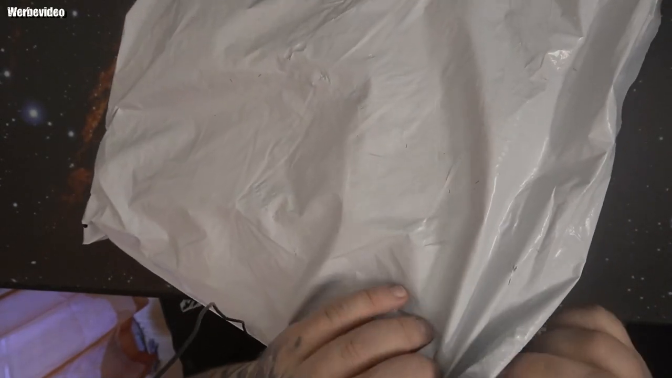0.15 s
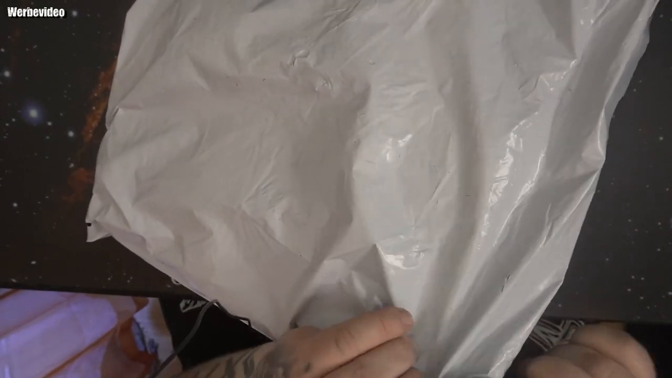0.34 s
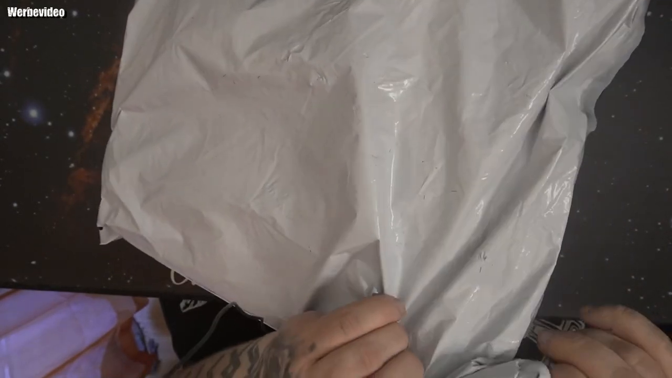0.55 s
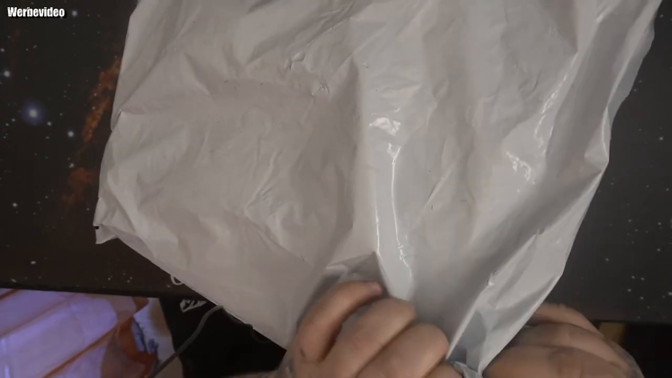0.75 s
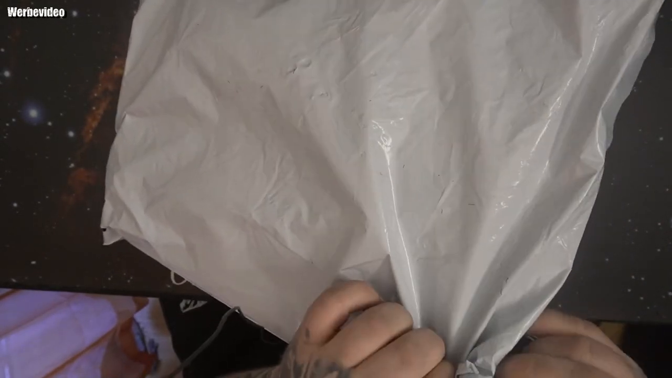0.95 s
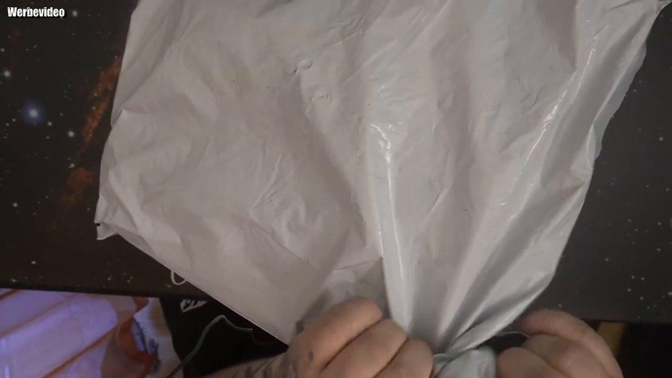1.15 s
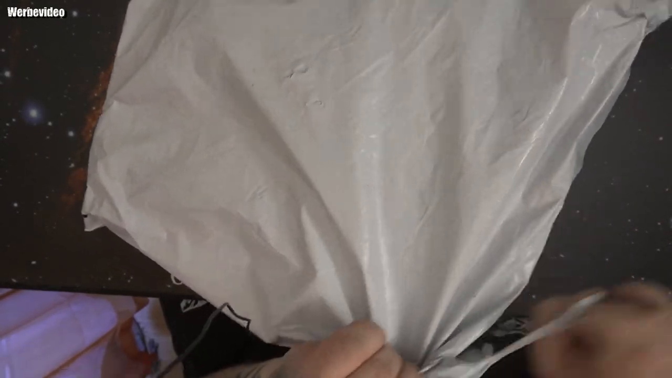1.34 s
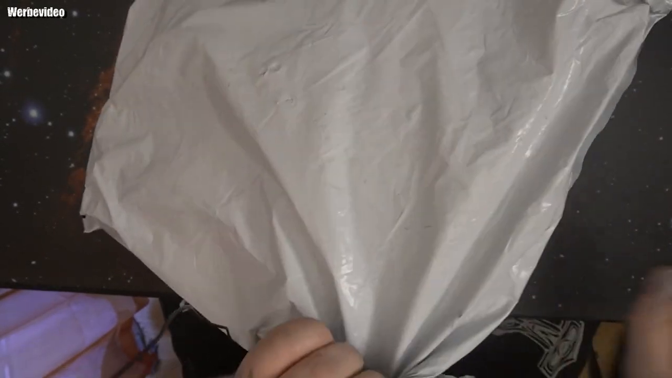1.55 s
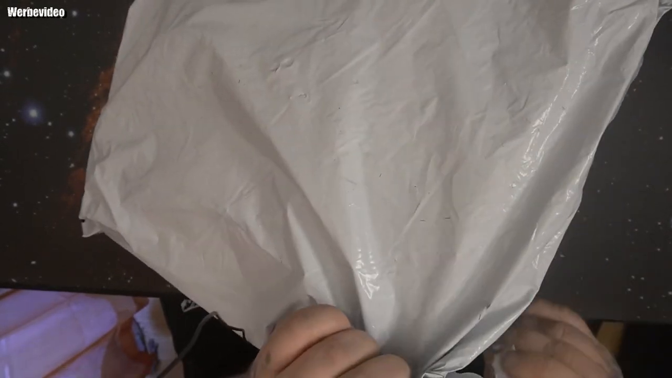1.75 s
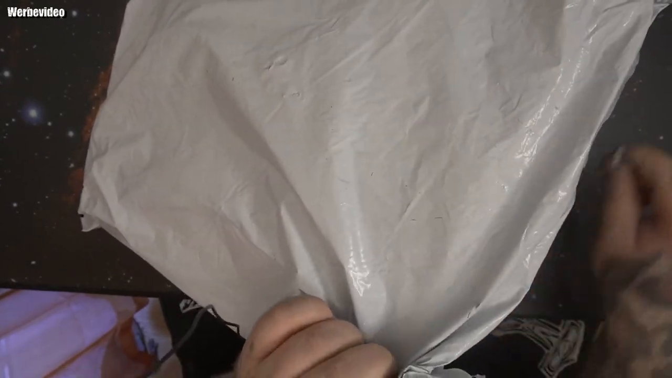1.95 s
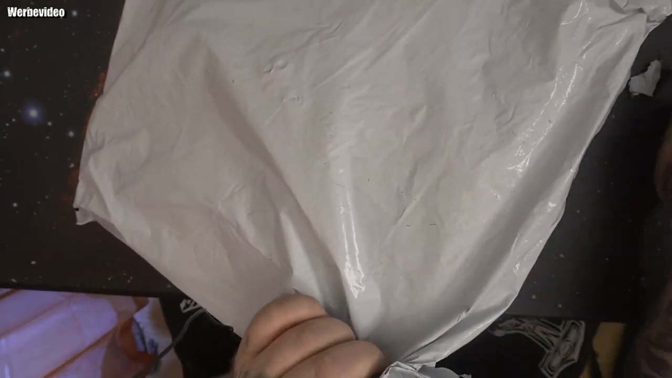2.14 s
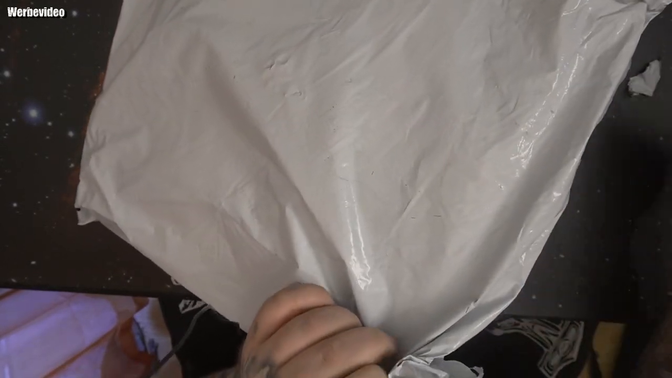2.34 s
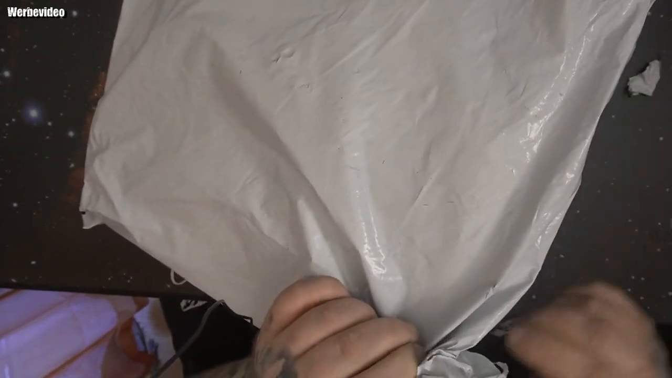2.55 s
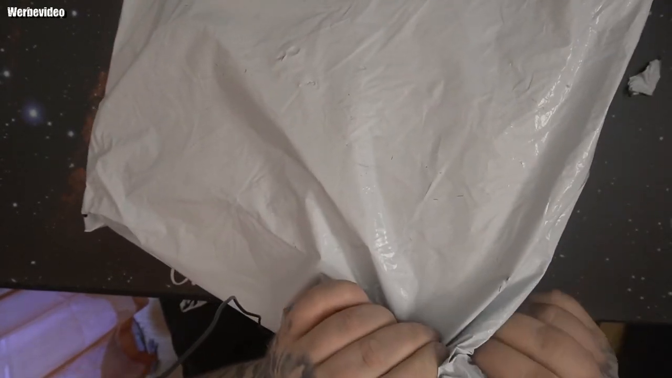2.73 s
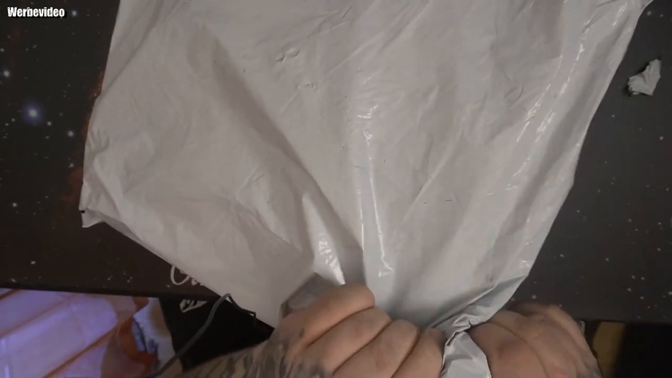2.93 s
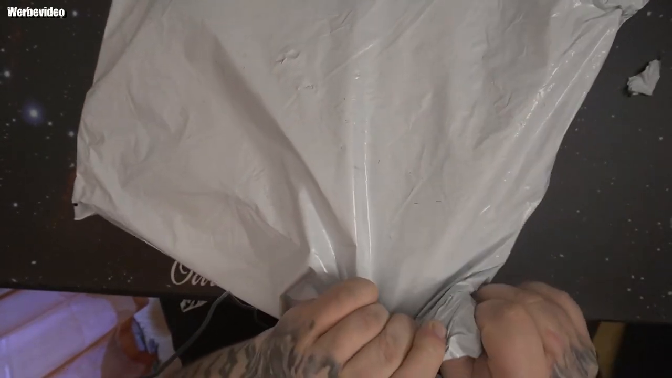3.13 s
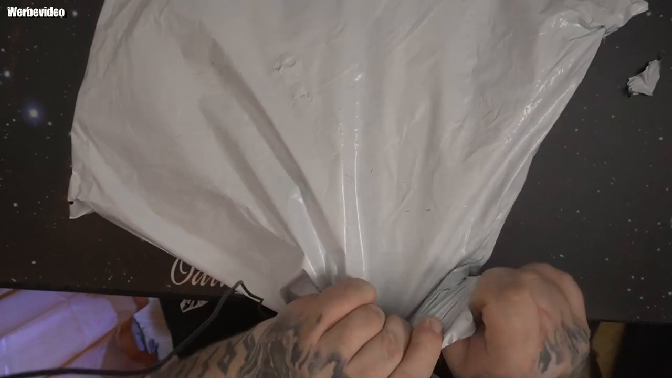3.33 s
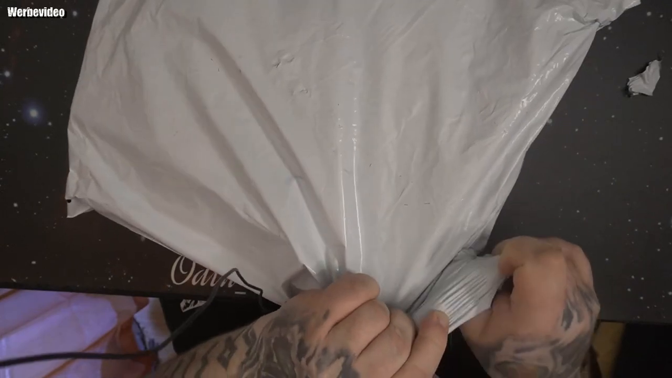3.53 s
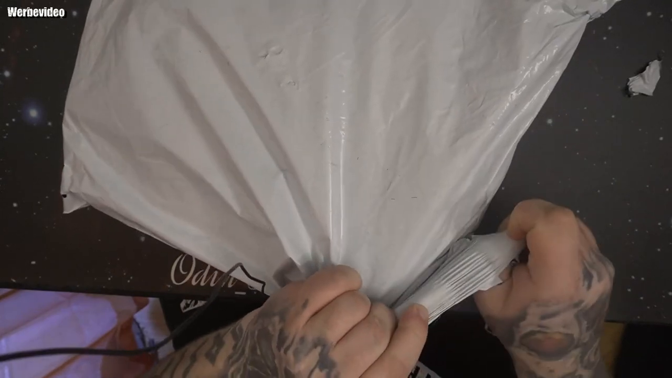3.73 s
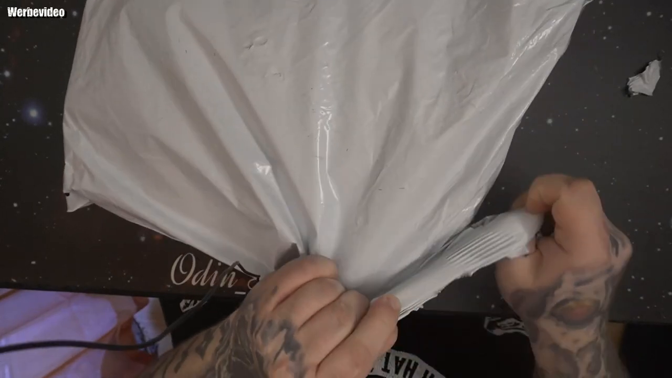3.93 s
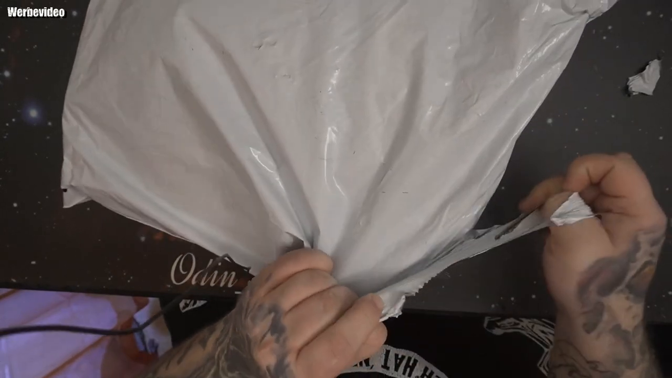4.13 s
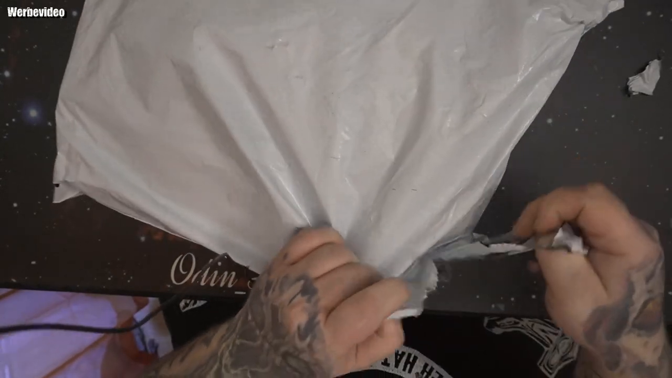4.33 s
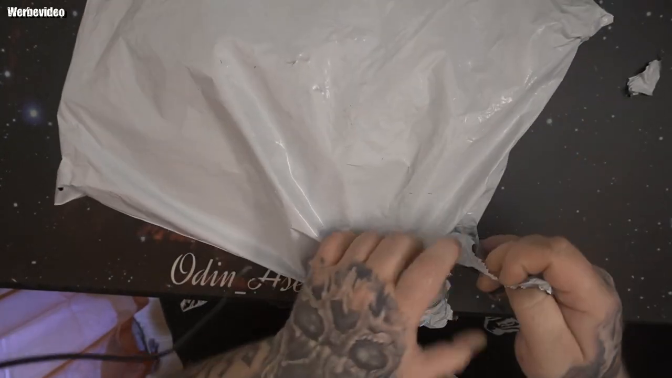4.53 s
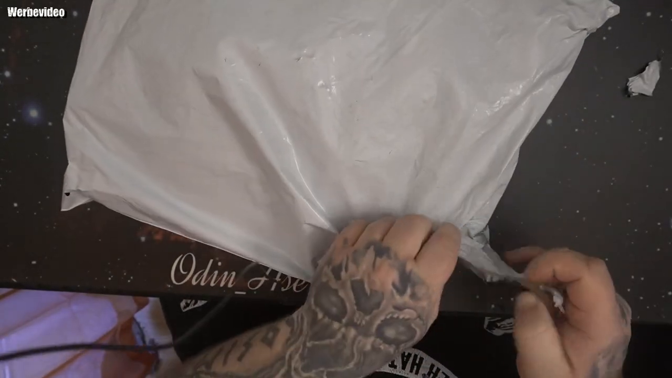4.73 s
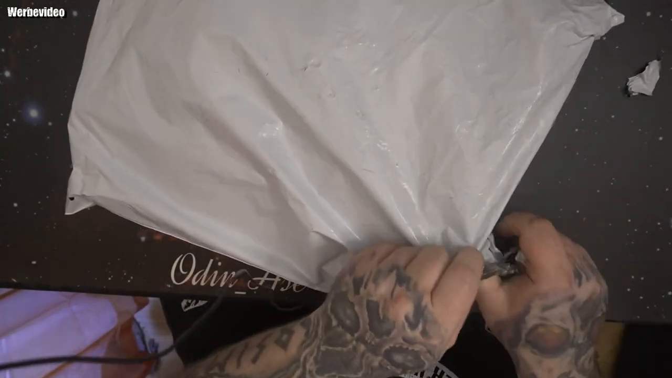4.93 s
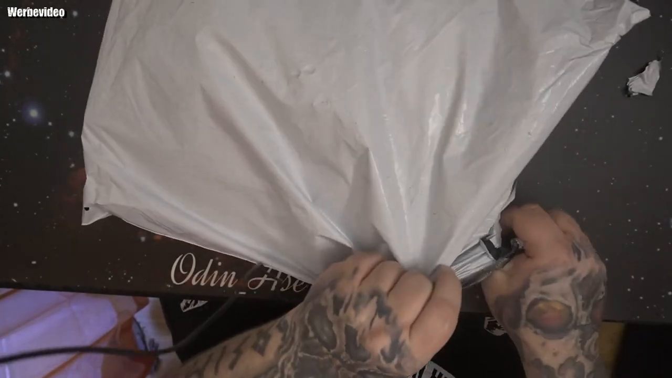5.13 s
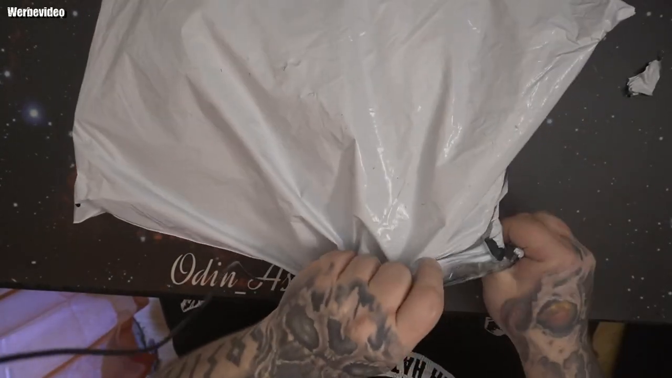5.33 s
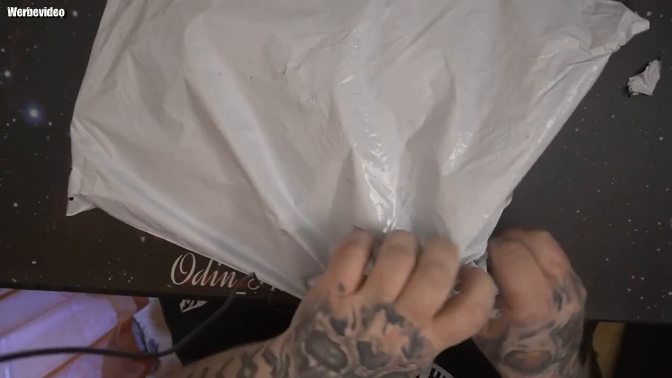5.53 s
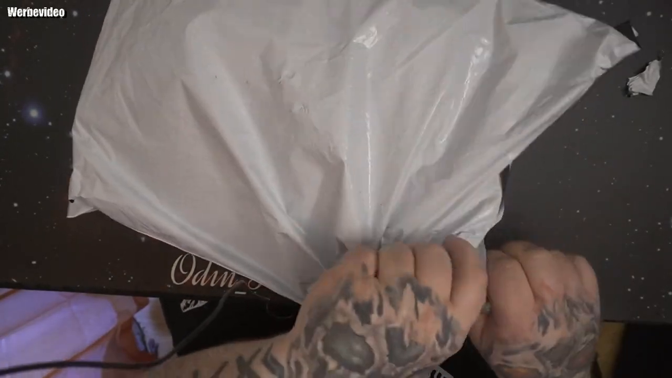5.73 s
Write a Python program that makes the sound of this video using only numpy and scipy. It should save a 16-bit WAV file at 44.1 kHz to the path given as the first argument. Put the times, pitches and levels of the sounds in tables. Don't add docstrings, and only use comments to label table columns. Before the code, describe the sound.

Hands crumple and twist a thin plastic mailer bag close to the microphone, pause almost silently, then stretch and tear it with sharp crackling snaps.

```python
import sys
import numpy as np
from scipy import signal
from scipy.fft import rfft, irfft
from scipy.io import wavfile

SR = 44100
rng = np.random.default_rng(int(sys.argv[2]) if len(sys.argv) > 2 else 0)


def generate_wav(signal):
    frames = np.transpose(np.atleast_2d(signal))
    scaled = np.clip(frames, -1, 1) * 32767
    pcm = np.round(scaled).astype(np.int16)
    wavfile.write(sys.argv[1], SR, pcm)


def volts_from_decibels(level):
    exponent = np.asarray(level, float) / 20
    return 10 ** exponent


N = 258867

# crest_s, crackle_db, build_s per 10 dB, release_s per 10 dB
SQUEEZES = [(0.15, -43, 0.023, 0.37), (0.2, -40, 0.035, 0.062), (0.255, -44, 0.018, .02),
            (0.33, -32.5, 0.066, 0.054), (0.438, -24, 0.042, 0.035), (0.619, -31.5, 0.019, 0.053),
            (0.7, -31.5, 0.037, 0.056), (0.786, -32, 0.14, 0.03), (0.929, -32.5, 0.12, 0.28),
            (1.196, -27, 0.043, 0.1), (1.365, -24.5, 0.0074, 0.024), (1.408, -31.5, 0.018, 0.13),
            (1.61, -56, .02, 0.055), (1.8, -49, 0.045, 0.017), (1.864, -50, .01, 0.099),
            (2.02, -58, 0.032, 0.038), (2.22, -51, 0.21, 0.067), (2.622, -49.5, 0.0088, 0.11),
            (2.665, -42, 0.02, .05), (2.71, -38.5, 0.038, 0.14), (2.837, -32, 0.027, 0.053),
            (2.94, -33.5, 0.11, 0.12), (3.056, -31, 0.13, 0.071), (3.334, -31.5, 0.21, 0.095),
            (3.428, -28, 0.02, 0.04), (3.512, -28.5, 0.043, 0.04), (3.668, -26.5, 0.062, 0.032),
            (3.874, -30.5, 0.07, 0.053), (4.032, -29, 0.015, 0.1), (4.453, -32.5, 0.17, 0.11),
            (4.61, -35, 0.012, 0.026), (4.775, -30, 0.023, 0.017), (4.683, -31, 0.027, 0.086),
            (4.889, -30, 0.1, 0.24), (5.075, -28, 0.018, 0.17), (5.368, -34.5, 0.051, 0.043),
            (5.505, -32.5, 0.078, 0.13), (5.869, -24.5, 0.25, 0.12)]
# time_s, resting_crackle_db, bag_slack_db, film_turned_to_microphone_db
HOLD = [(0, -45.5, 3.5, 5), (0.12, -54, 1, -2), (0.75, -46, -1, 8), (1.1, -45.5, -1.5, 5),
        (1.4, -53, 0, 7.5), (1.7, -63, 2.5, 0), (2.0, -59.5, 4, 9), (2.15, -67, -1.5, 3),
        (2.3, -57.5, 3, 12), (2.6, -63.5, -1, -7), (2.67, -56, -5, 4.5), (3.15, -50, 2, 1),
        (3.5, -48, -4.5, -5.5), (3.9, -40, 2.5, 5), (4.6, -48.5, -1.5, 1.5), (5.07, -37, 2.5, 2.5),
        (5.4, -52.5, 0.5, 2), (5.87, -31.5, 1, 1.5)]
# time_s, typical_crease_pitch_hz
CREASE_FINENESS = [
    (0, 4750),
    (1.4, 4700),
    (2.0, 7840),
    (2.8, 4280),
    (3.4, 7820),
    (4.1, 5450),
    (4.9, 7440),
    (5.87, 7280),
]
# frequency_hz, density_db per Hz
FILM = [(1180, -17), (2000, -18), (2540, -4.5), (2870, -1), (3280, -6), (3880, -3.5), (7860, 1),
        (11100, -6), (15800, -23.5), (16150, -70), (16500, -100)]
# frequency_hz, density_db per Hz
BODY = [(120, -41.5), (200, 0), (400, 2), (900, 0), (1050, -3.5), (1550, 1), (2300, -4.5), (3000, -4),
        (4200, -19.5), (7000, -59.5)]
# start_s, peak_db, crease_pitch_hz, body_share_db, length_ms
SNAPS = [(0.1484, -21, 3760, 3.5, 1.86), (0.2869, -25, 2720, 0, 0.59), (0.3082, -10, 6060, -15, 1.66),
         (0.706, -13, 4940, -7, 1.5), (0.8511, -14, 4560, -12, 0.97), (1.1775, -14, 5060, -30, 0.97),
         (1.33, -1.5, 3900, -13.5, 0.46), (1.351, -0.5, 4830, -36, 2.7), (1.3762, -7, 4340, -23, 1.8),
         (1.4012, -13.5, 9300, -0.5, 1.45), (2.4962, -38, 2420, 4.5, 3.4), (2.8464, -10, 4330, -37, 1.35),
         (3.1935, -8.5, 5150, -38, 1.6), (3.2032, -8, 8300, -33, 1.2), (3.589, -8.5, 7300, -24, 2.64),
         (3.5987, -2.5, 5630, -49, 1.32), (3.6702, -13.5, 2070, -6, 0.84), (3.6761, -3.5, 6550, -35, 2.97),
         (3.8161, -10.5, 6250, -26, 1.34), (4.018, -3.5, 5800, -9, 3.1), (4.4581, -13.5, 7550, -1.5, 0.24),
         (4.8325, -11.5, 7800, -9, 1.6), (5.7684, -18, 1610, -23, 4.4), (5.8349, 1, 6700, -25, 0.32)]
# start_s,
# peak_db, crease_pitch_hz
TICKS = [(0.0156, -33, 3950), (0.0716, -31, 1400), (0.1111, -21, 7200), (0.1142, -21, 4400),
         (0.1356, -11, 4930), (0.1935, -20, 5100), (0.2537, -23, 1380), (0.2598, -22, 1280),
         (0.34, -13, 3800), (0.351, -16, 6900), (0.3703, -20.5, 3920), (0.3788, -30, 1500),
         (0.387, -28, 1600), (0.417, -12.5, 5230), (0.4355, -17.5, 3700), (0.4546, -18, 5100),
         (0.4622, -15.5, 3650), (0.5493, -21, 3670), (0.5828, -22, 6940), (0.5947, -23, 5000),
         (0.6138, -21, 3500), (0.6256, -16, 3700), (0.629, -15, 5430), (0.6693, -14, 4200),
         (0.6783, -20.5, 1700), (0.684, -24, 1400), (0.702, -20, 1310), (0.7255, -17, 3720),
         (0.7392, -17, 5900),
         (0.775, -18.5, 6200), (0.777, -24, 9700), (0.793, -17, 4100), (0.8644, -24, 1680),
            (0.874, -23, 3900), (0.8873, -20, 6400), (0.9161, -20.5, 1610), (0.966, -27, 6600),
            (0.9967, -24.5, 8800), (1.0221, -20, 4670), (1.0368, -15.5, 6430), (1.0638, -35, 6800),
            (1.0793, -21.5, 3930), (1.0994, -17, 9100), (1.1029, -28, 3800), (1.1517, -27, 5200),
            (1.1666, -23, 4500), (1.1725, -14.5, 5170), (1.191, -16, 1600), (1.1982, -14.5, 4220),
            (1.2136, -13, 5200), (1.339, -22, 5600), (1.355, -11, 6200), (1.3677, -21, 3930),
            (1.424, -18, 8600),
         (1.529, -31, 1705), (1.5327, -28, 4500), (1.5537, -31, 5900), (1.5997, -36, 1460),
            (1.6081, -26, 4800), (1.639, -33, 4500), (1.6683, -35, 8400), (1.6818, -35, 7100),
            (1.685, -37, 5600), (1.7182, -29, 4800), (1.7356, -30, 1170), (1.793, -31, 1740),
            (1.8025, -22.5, 6400), (1.8161, -42, 1700), (1.862, -28, 1720), (1.9296, -24, 6900),
            (2.062, -40, 4020), (2.116, -39, 4100), (2.1388, -40, 4600), (2.1504, -35, 7500),
            (2.1583, -28, 5450), (2.1678, -35.5, 1720), (2.1928, -45, 1300), (2.208, -22, 7050),
            (2.2568, -34, 1390), (2.2603, -34, 6300), (2.269, -35, 5900), (2.2872, -38, 7800),
            (2.2926, -25, 5800), (2.3406, -34, 5500), (2.4078, -36, 4750), (2.472, -38, 1500),
            (2.5196, -36, 1400), (2.5785, -45, 1600), (2.589, -34, 3700), (2.593, -36.5, 1880),
         (2.666, -32, 7200), (2.6894, -25, 3960), (2.7045, -20, 4200), (2.7387, -46, 3700),
           (2.747, -17, 5300), (2.7588, -29, 3500), (2.797, -29, 5700), (2.82, -18.5, 4200),
           (2.8277, -24, 4600), (2.8326, -28, 1720), (2.8434, -23, 4100), (2.858, -23, 4700),
           (2.87, -25, 4330), (2.8993, -18.5, 5300), (2.903, -17, 5170), (2.9348, -20.5, 2580),
           (2.9453, -24, 7600), (2.9783, -25, 1400), (3.024, -19, 5000), (3.0474, -20, 4000),
           (3.0513, -13.5, 6400), (3.1004, -22, 5400), (3.1239, -22, 6100), (3.1553, -26, 1860),
           (3.1615, -26, 1300), (3.208, -18, 6860), (3.235, -16, 7100), (3.2574, -10.5, 6600),
           (3.2668, -8, 7040), (3.2773, -18, 7300), (3.2819, -19, 1570), (3.298, -21, 1600),
           (3.304, -19, 1660), (3.3417, -14.5, 4220), (3.3443, -9, 7950),
         (3.3518, -20, 1570), (3.4096, -8, 9200), (3.4331, -11, 7700), (3.4393, -20, 4660),
           (3.455, -13.5, 1530), (3.4793, -18, 6000), (3.4884, -16, 5540), (3.4961, -23, 1620),
           (3.5105, -16, 4250), (3.5245, -7.5, 7050), (3.527, -18, 6660), (3.5594, -24, 6400),
           (3.5627, -13, 7550), (3.5835, -20, 6700), (3.6055, -17, 4800), (3.6128, -10, 7500),
           (3.6448, -10, 7800), (3.652, -19, 9000), (3.6634, -23, 1500), (3.6788, -13.5, 1670),
           (3.6854, -10.5, 6300), (3.738, -19, 5560), (3.7512, -16.5, 2040), (3.7658, -19, 7700),
           (3.8365, -12.5, 5000), (3.8576, -18, 7750), (3.8763, -18, 5000), (3.8845, -17, 7300),
           (3.9225, -16.5, 4500), (3.932, -35, 1610), (3.9372, -13.5, 6940), (3.9623, -20.5, 5600),
           (4.0011, -18, 4020),
         (4.0391, -31, 5630), (4.065, -20, 6200), (4.0786, -17, 5300), (4.089, -19, 7400),
          (4.101, -21.5, 3170), (4.1588, -26, 2800), (4.1695, -24, 1200), (4.1846, -22, 7400),
          (4.191, -25.5, 1500), (4.231, -16, 5800), (4.291, -30, 8000), (4.3038, -15.5, 6270),
          (4.3726, -19.5, 8500), (4.386, -25, 3660), (4.4074, -10, 4760), (4.4532, -10.5, 7860),
          (4.509, -14.5, 7300), (4.528, -21, 5800), (4.5438, -24, 9000), (4.5747, -15, 6100),
          (4.6253, -29, 7900), (4.6798, -26, 7600), (4.687, -20, 7500), (4.6895, -19, 8000),
          (4.7123, -15, 6450), (4.7701, -23, 6700), (4.777, -21, 5730), (4.817, -17.5, 6000),
          (4.8452, -13, 5600),
         (4.855, -15, 7700), (4.8847, -17, 3900), (4.9015, -13, 7700), (4.9477, -16, 6300),
            (4.968, -23, 7900), (4.9877, -24, 5000), (5.0145, -8, 7360), (5.0417, -15, 5100),
            (5.057, -16, 7600), (5.063, -4, 7900), (5.0691, -17, 6600), (5.085, -14, 7300),
            (5.114, -10, 7500), (5.1276, -12, 7500), (5.1338, -12, 8100), (5.1446, -9.5, 7400),
            (5.193, -23, 1900), (5.1949, -19.5, 1580), (5.2414, -15.5, 6540), (5.2604, -25, 6860),
            (5.2663, -20, 6960), (5.2738, -17, 5400), (5.3216, -28, 7690), (5.3543, -16.5, 6900),
            (5.3612, -21, 6400), (5.3722, -19, 7100), (5.3781, -11.5, 7100), (5.4022, -36, 8700),
            (5.4181, -35, 1500), (5.4329, -31, 8100), (5.449, -25, 5400), (5.4698, -15, 7100),
            (5.493, -16, 7650), (5.4966, -22, 6500), (5.502, -19, 6540), (5.5105, -20.5, 1800),
            (5.561, -8.5, 7200), (5.5704, -21, 6230), (5.5768, -19, 6500), (5.5847, -14, 7100),
            (5.6538, -9.5, 7900), (5.6653, -7.5, 7600), (5.6674, -12.5, 6200), (5.6998, -12.5, 6300),
            (5.7324, -13, 8200), (5.7436, -9, 6100), (5.7958, -7, 6370), (5.809, -14.5, 8400),
            (5.8135, -8, 7600), (5.8382, -10.5, 8500), (5.8432, -19, 7200),
         (0.479, -23, 5300),
    (1.3614, -16, 10000),
    (1.371, -19, 1200),
    (1.3813, -11, 5200),
    (1.41, -14, 4100),
    (1.9, -38, 5500),
    (2.6327, -33.5, 4330),
    (5.0105, -31, 12500),
    (5.1805, -29, 12000),
]
# start_s, peak_db, pitch_hz, t60_s
POPS = [(0.14, -25.5, 398, 0.049), (0.734, -20, 270, 0.013), (0.842, -22, 440, 0.0092),
        (1.186, -12, 610, 0.0058), (1.3256, -7, 2200, 0.0035), (1.344, -18, 187, 0.02),
        (1.367, -19, 1110, 0.0044), (1.396, -19.5, 820, 0.014), (2.49, -35, 1890, 0.0043),
        (2.66, -35, 298, 0.024), (2.699, -34, 406, 0.026), (2.829, -44, 716, 0.034),
        (3.4503, -19.5, 950, 0.0071), (3.594, -31, 920, 0.045), (3.656, -18.5, 697, 0.052),
        (3.676, -12.5, 835, 0.0077), (4.0128, -5.5, 420, 0.013), (4.0141, -12, 910, 0.012),
        (4.0132, -11, 2850, 0.0076), (4.047, -30, 322, .03), (4.1022, -21, 302, 0.028),
        (4.285, -28, 580, 0.011), (4.452, -28, 367, 0.025), (4.761, -30, 810, 0.046),
        (4.991, -24, 960, 0.018), (5.081, -27, 457, 0.049), (5.419, -36, 390, 0.033),
        (5.745, -35, 540, 0.022)]
# crest_s, level_db, centre_hz, length_s
BRUSHES = [(0.059, -49.5, 10200, 0.037), (0.198, -43, 8100, 0.053), (1.498, -39.5, 8600, 0.028),
           (1.607, -46, 8050, 0.029), (1.736, -55.5, 8100, 0.046), (1.903, -57, 9000, 0.025),
           (2.015, -51.5, 9400, 0.039), (2.213, -41, 9100, 0.017), (2.28, -59, 8540, 0.04),
           (2.64, -55, 11000, 0.028), (1.372, -28, 4960, 0.01), (1.375, -31, 11200, 0.025),
           (4.913, -36.5, 7700, 0.05), (5.1, -34, 7540, 0.17)]
# time_s, sway_db, rubbing_db
SWAY = [(0.0, -43, -48), (0.34, -33, -47), (0.45, -47.5, -53.5), (0.67, -28, -47), (0.9, -48.5, -52.5),
        (1.15, -32, -55), (1.91, -30.5, -50), (2.25, -37, -47.5), (2.75, -39.5, -56.5),
        (3.12, -38.5, -44.5), (3.35, -35.5, -68), (3.9, -29, -56), (4.15, -32, -45.5), (4.72, -43.5, -56),
        (5.0, -43, -46.5), (5.36, -31.5, -53), (5.7, -44.5, -51), (5.87, -35, -50)]
# start_s, peak_db, sway_pitch_hz
BUMPS = [
    (1.601, -17, 3.5),
    (1.717, -15, 11),
    (1.996, -28, 49),
    (2.489, -15, 6.7),
    (3.678, -5, 4.5),
    (3.816, -6.5, 14),
    (4.38, -25, 17),
]
# frequency_hz, density_db per Hz
ROOM = [(180, -34), (300, 8), (781, 7.5), (1420, -9.5), (2690, -18), (4280, -6.5), (10500, -13),
        (14000, -21)]


def rms_one(x):
    return x / np.sqrt(np.mean(x ** 2) + 1e-20)


def in_time(rows):
    s, *columns = np.transpose(rows)
    return [np.interp(np.arange(N) / SR, s, c) for c in columns]


def coloured(x, spectrum, size=4096):
    hz, db = np.transpose(spectrum)
    grid = np.maximum(np.arange(size // 2 + 1) * SR / size, 1)
    cepstrum = irfft(np.log(volts_from_decibels(np.interp(np.log(grid), np.log(hz), db))))
    cepstrum[1:size // 2] *= 2
    cepstrum[size // 2 + 1:] = 0
    impulse_response = irfft(np.exp(rfft(cepstrum)))
    return signal.fftconvolve(x, impulse_response)[:len(x)]


def drift(rate_hz):
    r = np.exp(-2 * np.pi * rate_hz / SR)
    wander = signal.lfilter([1], [1, -2 * r, r * r], rng.standard_normal(N + SR))
    return rms_one(wander[SR:])


def ring(x, hz, t60):
    r, w = volts_from_decibels(-60 / (t60 * SR)), 2 * np.pi * hz / SR
    return signal.lfilter([0, np.sin(w)], [1, -2 * r * np.cos(w), r * r], x + 1e-18)


def add(out, s, x):
    i = max(round(s * SR), 0)
    out[i:i + len(x)] += x[:N - i]


def grip(rest_db):
    power, t = volts_from_decibels(2 * rest_db), np.arange(N) / SR
    for s, db, build_s, release_s in SQUEEZES:
        rise = (s - t) / max(build_s, .01)
        fall = (t - s) / max(release_s, .01)
        power = power + volts_from_decibels(2 * (db - 10 * np.maximum(rise, fall)))
    return 10 * np.log10(power)


def crackle(film_db, body_db):
    typical_hz = in_time(CREASE_FINENESS)[0]
    per_s = 850 * volts_from_decibels(.45 * (film_db + 40)) * typical_hz / 5500
    born = rng.random(N) < per_s * volts_from_decibels(2.2 * drift(40)) / SR
    sizes = born * volts_from_decibels(4 * np.minimum(rng.exponential(1, N), 1.9)) / np.sqrt(per_s)
    fall = np.exp(-1 / (.00045 * SR))
    bursts = signal.lfilter([1], [1, -fall], sizes) * rng.standard_normal(N)

    pitches = np.geomspace(2800, 11000, 12)
    crease_hz = typical_hz * np.exp(0.27 * rng.standard_normal(N))
    dealt = np.minimum(np.searchsorted(pitches, crease_hz), len(pitches) - 1)
    owner = dealt[np.maximum.accumulate(np.arange(N) * born)]
    tuned = sum(ring(bursts * (owner == k), hz, 3.9 / hz) for k, hz in enumerate(pitches))

    slide = rng.standard_normal(N) * volts_from_decibels(5.2 * drift(36))
    film = rms_one(coloured(.65 * rms_one(bursts) + rms_one(tuned) + .42 * slide, FILM))
    nudges = rms_one(bursts * volts_from_decibels(3.9 * drift(37)))
    nudges = nudges + 0.88 * rng.standard_normal(N) * volts_from_decibels(2.2 * drift(38))
    body = rms_one(coloured(nudges, BODY))
    return volts_from_decibels(film_db - 3.0) * film + volts_from_decibels(body_db - 3.0) * body


def snaps(table):
    out, t = np.zeros(N), np.arange(2048) / SR
    noise = rng.standard_normal((len(table), 2, len(t)))
    soft = signal.butter(3, 13000, fs=SR, output="sos")
    for (s, peak_db, hz, body_db, ms), (crack, tail) in zip(table, noise):
        tau = max(.7 * ms, .2) / 1000
        burst = 0.14 * crack * (1 - np.exp(-6 * t / tau)) * np.exp(-1.2 * t / tau)
        burst[round(.2 * tau * SR)] += 0.47 * np.sign(crack[0])
        flutter = .05 * tail * np.exp(-t / .007)
        bright = coloured(burst + flutter, FILM, size=512)
        tuned = signal.sosfilt(soft, ring(burst, hz, min(13 / hz, .004)))
        crisp = 0.2 * np.sqrt(min(hz / 4000, 1))
        high = crisp * bright / np.max(np.abs(bright)) + 0.49 * tuned / np.max(np.abs(tuned))
        low = coloured(burst, BODY, size=1024)
        snap = high / np.max(np.abs(high)) + volts_from_decibels(body_db) * low / np.max(np.abs(low))
        add(out, s - 0.35 * tau, volts_from_decibels(peak_db) * snap)
    return out


def pops():
    out, t = np.zeros(N), np.arange(4096) / SR
    for s, peak_db, hz, t60 in POPS:
        push = np.gradient(t ** 2 * np.exp(-t * hz * 9))
        t60 = max(t60, .004)
        pop = ring(push, hz, t60) + .5 * ring(push, 2.29 * hz, t60 * 0.56)
        add(out, s + 0.00445, volts_from_decibels(peak_db) * pop / np.max(np.abs(pop)))
    return out


def brushes():
    out, t = np.zeros(N), np.arange(N) / SR
    white = rng.standard_normal(N)
    for s, level_db, hz, length_s in BRUSHES:
        octave = signal.butter(3, [hz / 1.5, min(hz * 1.27, 15500)], "band", fs=SR, output="sos")
        hiss = rms_one(signal.sosfilt(octave, white))
        out += volts_from_decibels(level_db) * hiss * np.exp(-2 * ((t - s) / length_s) ** 2)
    return out


def bag_sound(film_db):
    _, slack_db, sheen_db = in_time(HOLD)
    body_db = -40.5 + 0.92 * (film_db + 39.5) + slack_db
    rustle = crackle(film_db, body_db)
    deep = signal.sosfiltfilt(signal.butter(2, 650, fs=SR, output="sos"), rustle)
    taut_db = -10.5 * np.log2(in_time(CREASE_FINENESS)[0] / 5000)
    rustle = rustle + (volts_from_decibels(taut_db) - 1) * deep

    ticks = TICKS
    ticks = [(*tick, -20.5, 1.3) for tick in ticks]      # body_share_db, length_ms
    bag = rustle + snaps(SNAPS + ticks) + pops()
    dull = signal.sosfiltfilt(signal.butter(2, 8500, fs=SR, output="sos"), bag)
    bag = dull + volts_from_decibels(np.minimum(sheen_db, 8.0)) * (bag - dull) + brushes()
    return signal.sosfilt(signal.butter(2, 190, "high", fs=SR, output="sos"), bag)


def stand(grip_db):
    sway = ring(rng.standard_normal(N + SR), 11.3, 0.17)
    sway = sway + 0.33 * ring(rng.standard_normal(N + SR), 25.7, 0.14)
    sway_db, rub_db = in_time(SWAY)
    lumps_db = 4.2 * np.clip(drift(21.0), -2, 1.5)
    rumble_db = rub_db + 0.51 * (grip_db + 35.0) + lumps_db
    band = signal.butter(2, [45, 210], "band", fs=SR, output="sos")
    rumble = signal.sosfilt(band, rng.standard_normal(N))
    out = volts_from_decibels(sway_db) * rms_one(sway[SR:]) + volts_from_decibels(rumble_db) * rms_one(rumble)
    t = np.arange(8192) / SR
    for s, peak_db, hz in BUMPS:
        dip = -np.exp(-np.abs(t - .008) / 0.0025)
        swing = np.sin(2 * np.pi * hz * np.maximum(t - .008, 0)) * np.exp(-t / 0.019)
        add(out, s, volts_from_decibels(peak_db) * (0.25 * dip + 0.8 * swing))
    return out


def room(x, t60=0.26, wet_db=-16):
    t = np.arange(SR // 3) / SR
    tail = rng.standard_normal(len(t)) * volts_from_decibels(-60 * t / t60) * (t > .003)
    tail = signal.lfilter([.4], [1, -.6], tail)
    return volts_from_decibels(wet_db) * signal.fftconvolve(x, tail / np.sqrt(np.sum(tail ** 2)))[:N]


def hush():
    return volts_from_decibels(-57.5) * rms_one(coloured(rng.standard_normal(N), ROOM))


def scene():
    film_db = grip(in_time(HOLD)[0])
    bag = bag_sound(film_db)
    return (bag + room(bag) + stand(film_db) + hush())[None]


def band_limit(x):
    return signal.sosfilt(signal.butter(12, 16980, fs=SR, output="sos"), x)


def record(dry):
    clipped = np.clip(dry, -.88, .88)
    low_pass = signal.cheby2(10, 40, 16600, fs=SR, output="sos")
    return band_limit(signal.sosfilt(low_pass, clipped))


dry = scene()
out = record(dry)
generate_wav(out)
```